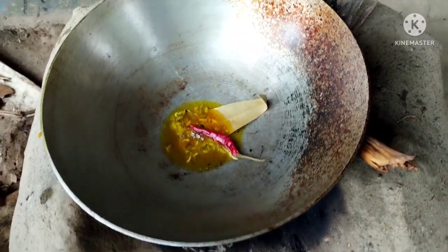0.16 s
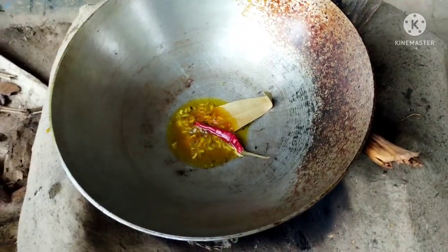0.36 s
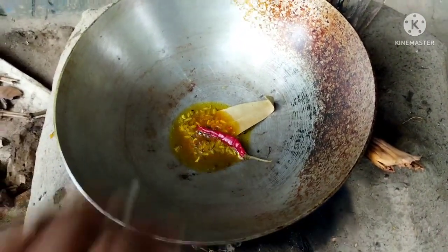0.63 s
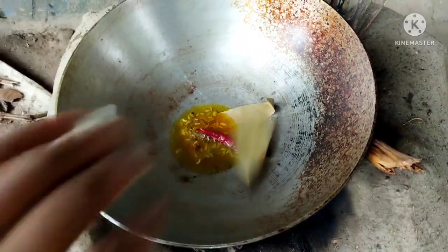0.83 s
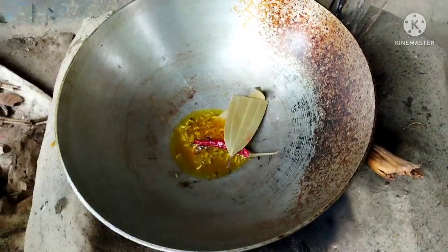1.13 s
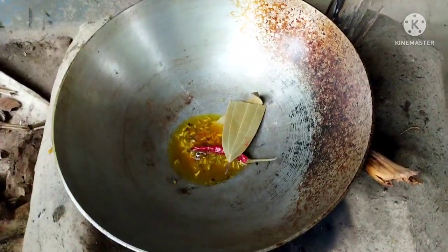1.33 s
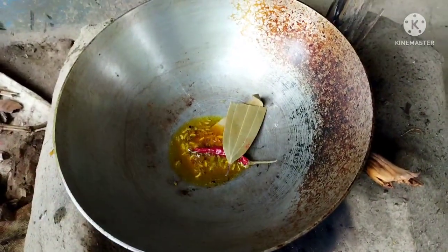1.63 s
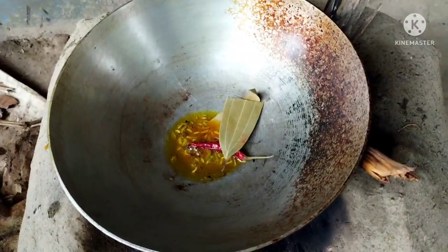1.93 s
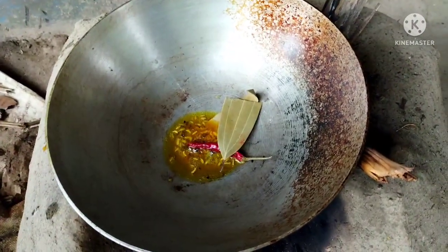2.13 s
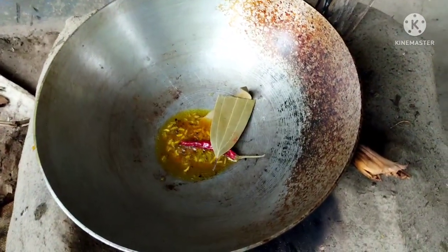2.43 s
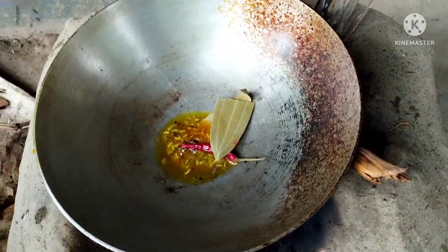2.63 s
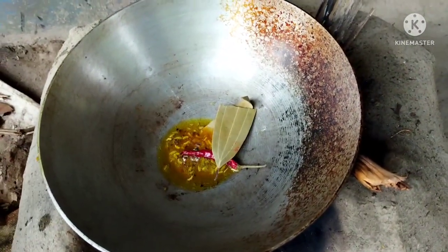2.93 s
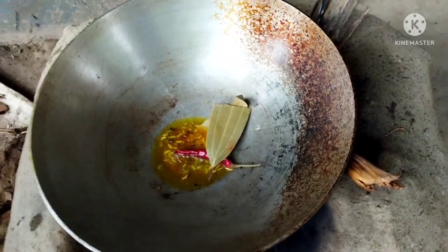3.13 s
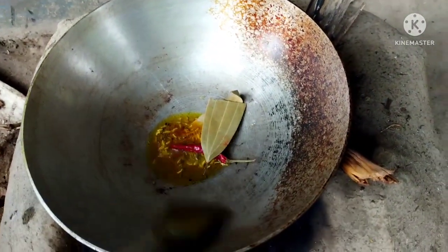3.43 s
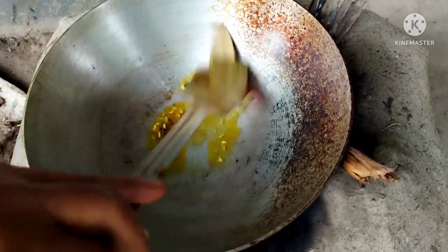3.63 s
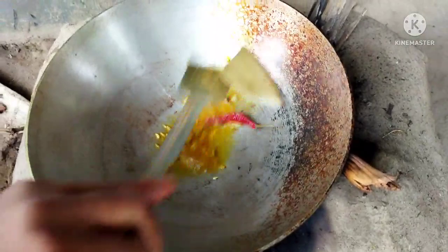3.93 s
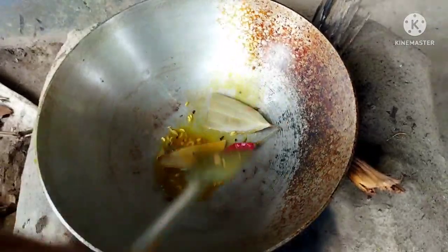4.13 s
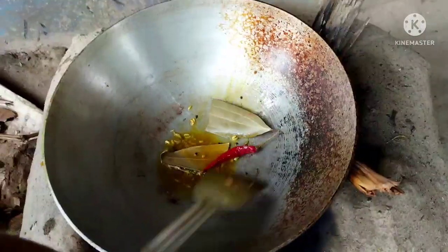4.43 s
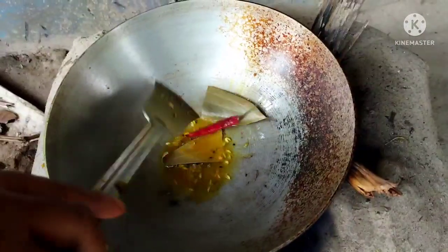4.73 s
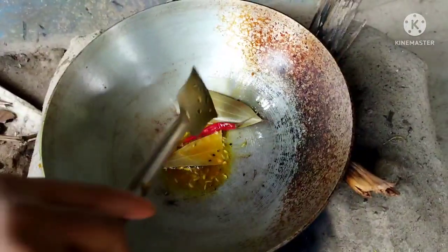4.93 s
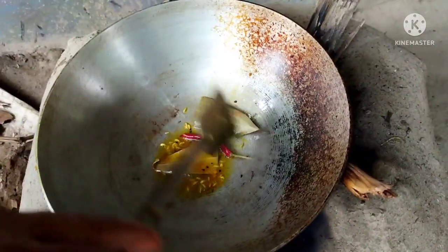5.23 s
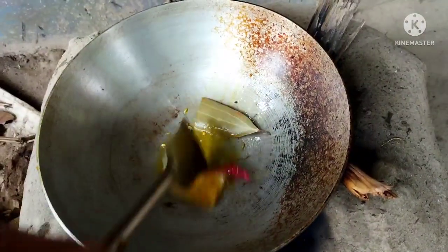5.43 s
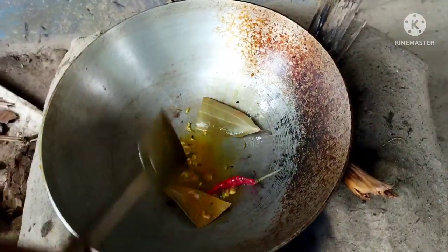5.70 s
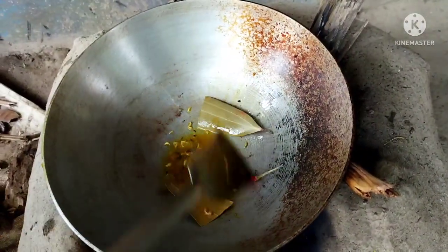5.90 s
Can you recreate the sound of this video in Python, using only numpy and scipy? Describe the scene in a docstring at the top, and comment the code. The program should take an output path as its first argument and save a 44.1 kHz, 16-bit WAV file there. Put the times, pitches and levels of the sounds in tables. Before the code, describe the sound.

A close microphone over a steel wok in a small walled yard catches a soft low fire rumble and very faint oil hiss. From 0 to 0.8 s dry spices knock and rustle in quick chatters, with hard clacks near 0.23 and 0.61 s; seeds snap around 0.18 and 0.9 s. Thin, breathy bird whistles droop faintly near 0.1, 1.1, 1.9 and 3 s. Light knocks return around 1.7-1.85 s. The fire deepens at 2.5 s while a spatula clinks delicately until 2.7 s; seeds pop at 2.9 s. At 3.33 s the blade scrapes the bowl, its hollow rub sweeping down at 3.5 s. Sizzling swells to a bright, dense peak around 4-4.4 s, then surges with uneven strokes, spitting drops and falling bubble pings. Gritty scrapes and dull bowl contacts punctuate 5.1-5.6 s, and lively sizzling continues to the end at about 6 s.

```python
"""Oil and whole spices sizzle in a steel wok over a wood fire in a walled yard: dense clicks and pings.
At first the fire rumbles in filtered noise, dry spices rustle and clatter through struck modes,
seeds pop as tiny chirps, a small bird whistles in gliding sines and a steel spatula rings in sines.
Then the spatula scrapes in uneven clicks and noise through the wok's modes, its hollow sweeps down,
and the stirred oil breaks into a loud sizzle with spitting drops and pinging bubbles."""
import sys
import numpy as np
from scipy import signal
from scipy.io import wavfile
from scipy.ndimage import uniform_filter1d

SR = 44100
rng = np.random.default_rng(int(sys.argv[2]) if len(sys.argv) > 2 else 0)


def output_pcm(signal):
    """Save a mono or channel-first signal as 16-bit PCM at the path in sys.argv[1].

    Samples are clipped to [-1, 1] before scaling.
    """
    pcm = np.clip(np.atleast_2d(signal).T, -1, 1) * 32767
    wavfile.write(sys.argv[1], SR, np.round(pcm).astype(np.int16))


N = 267246
TIME = np.arange(N) / SR

# strokes pushing oil onto hot steel: start_s, length_s, level_db, coarse_db (share of low crackle, relative)
STIR_STROKES = [(3.328, 0.095, -27.5, 10.5), (3.468, 0.1, -18, 1.5), (3.587, 0.081, -24, -7),
                (3.709, 0.12, -22, -3.5), (3.913, 0.2, -16.5, -1), (3.998, 0.1, -16, -2.5),
                (4.148, 0.073, -15.5, -4), (4.243, 0.2, -14, -3.5), (4.447, 0.15, -20, -3),
                (4.599, 0.13, -16, -4.5), (4.748, 0.08, -21, -10), (4.843, 0.15, -19.5, -6),
                (5.122, 0.29, -20.5, -1), (5.457, 0.05, -19, -4.5), (5.528, 0.16, -18.5, -6.5),
                (5.706, 0.19, -18.5, -6), (5.934, 0.13, -19, -1.5)]
# spectrum of stirred oil: frequency_hz, level_db
SIZZLE_COLOUR = [(150, -32), (400, -23), (850, -17), (1200, -20), (2300, -16), (3200, -10.5), (5000, -7.5),
                 (6100, 1), (8900, 3), (10200, -2.5), (11300, -7), (12800, -16), (15500, -10.5)]
# spectrum of a sharp crack or tap: frequency_hz, level_db
CRACK_COLOUR = [(300, -19.5), (900, -18.5), (3000, -8.5), (5000, -5), (8500, 2.5), (10500, -4.5),
                (13000, -24), (15500, -20)]

SLIDE_FALL_DB_PER_S = 301  # how fast a slide dies when it stops
BITE_RISE_S = 0.011


def amp(db):
    """Decibels to gain."""
    return 10 ** (np.asarray(db) / 20)


def evened(x):
    """Scales to rms 1."""
    return x / np.sqrt(np.mean(x ** 2) + 1e-20)


def read(points, hz):
    """Reads a spectrum on a log-frequency axis."""
    f, value = np.transpose(points)
    return np.interp(np.log(hz + 1), np.log(f + 1), value)


def follow(rows):
    """The columns of a curve at every sample."""
    s, *columns = np.transpose(rows)
    return [np.interp(TIME, s, c) for c in columns]


def add(mix, s, sound):
    """Mixes a sound in at time s."""
    part = mix[max(round(s * SR), 0):][:len(sound)]
    part += sound[:len(part)]


def colour(x, points):
    """Causal filter with the given spectrum; white noise keeps its power."""
    log_gain = np.log(amp(read(points, abs(np.fft.fftfreq(2 ** 12, 1 / SR)))))
    # the Hilbert transform gives the minimum phase
    taps = np.fft.ifft(np.exp(np.conj(signal.hilbert(log_gain)))).real
    return signal.oaconvolve(x, taps / np.linalg.norm(taps))[:len(x)]


def band(x, hz, kind, order=2):
    """High-pass or low-pass."""
    return signal.sosfilt(signal.butter(order, hz, kind, fs=SR, output="sos"), x)


def ring(x, modes):
    """Passes x through resonances (Hz, width, dB); white noise keeps its power."""
    t = TIME[:SR // 4]
    taps = sum(amp(db) * width * np.exp(-np.pi * width * t) * np.cos(2 * np.pi * hz * t)
               for hz, width, db in modes)
    return signal.oaconvolve(x, taps / np.linalg.norm(taps))[:len(x)]


def struck(modes, contact_hz):
    """The modes (Hz, width, dB) as a contact of the given pitch wakes them, favouring near ones."""
    focus_db = 23.5  # loss one octave away
    return [(hz, width, db - focus_db * np.log2(hz / contact_hz) ** 2) for hz, width, db in modes]


def glide(x, hz, width):
    """One resonance that follows the curve hz: shifted down to zero, smoothed and shifted back."""
    turn = np.exp(2j * np.pi * np.cumsum(hz) / SR)
    r = np.exp(-np.pi * width / SR)
    smoothed = signal.lfilter([(1 - r) ** 2], np.poly([r, r]), x / turn + 1e-18)
    return 2 * (turn * smoothed).real


def held(s, length, rise_s, fall_db_per_s):
    """Envelope: rises at time s, holds until s + length, then dies away."""
    t = TIME - s
    return np.clip(t / rise_s, 0, 1) * amp(-abs(fall_db_per_s) * np.maximum(t - length, 0))


def uneven(db, size):
    """A gain that wanders by db rms, smoothed over size samples."""
    return amp(db * evened(uniform_filter1d(rng.standard_normal(N), size=size)))


def clicks(per_s, spread_db, largest=2.6):
    """Random clicks of rms 1: many small, a few large."""
    size = amp(spread_db * np.minimum(rng.exponential(1, N), largest))
    sign = rng.choice([-1, 1], N)
    return evened(size * sign * (rng.random(N) < per_s / SR))


def fizz(per_s, spread_db, count=24):
    """Steam bubbles burst: bare ticks and short pings of random size, spread over many pitches."""
    pings = sum(ring(clicks(per_s / count, spread_db), [(hz, rng.uniform(330, 940), 0)])
                for hz in np.linspace(2500, 14000, count))
    return evened(evened(pings) + 2.0 * clicks(per_s, spread_db))


def cracks(rows):
    """One sharp crack for each row, treble first as the steel spreads it: a falling chirp."""
    crack_s = .001
    out, t = np.zeros(N), np.arange(0, crack_s, 1 / SR)
    crack = signal.chirp(t, 16000, crack_s, 0, phi=90) * signal.windows.tukey(len(t), .2)
    for s, db in rows:
        add(out, s - crack_s / 2, amp(db) * crack / np.linalg.norm(crack))
    return out


def yard(x, longer=1):
    """Close reflections from wok, ground and walls: noise dying at its own rate in each band."""
    # decay of the reflections: frequency_hz, t60_s (scaled by longer)
    decay = [(300, 0.055), (1000, 0.14), (2800, 0.13), (7500, 0.12), (15000, 0.0042)]
    t = TIME[:SR // 2]
    hz, s, z = signal.stft(rng.standard_normal(len(t)), SR, nperseg=128)
    fading = z * amp(-60 * s / (longer * read(decay, hz)[:, None]))
    tail = signal.istft(fading, SR)[1][:len(t)] * (t > .001)
    return signal.oaconvolve(x, tail / np.linalg.norm(tail))[:N]


def bowl_echo(x):
    """The curved wall of the wok returns each burst a moment later."""
    echo_s, echo_db = .002863, -14
    out = x.copy()
    add(out, echo_s, amp(echo_db) * x)
    return out / np.hypot(1, amp(echo_db))


def hearth():
    """The low rumble of the fire, deepening with each gust, and the faint hiss of resting oil."""
    # spectrum of the fire: frequency_hz, level_db
    rumble_colour = [(30, -0.5), (60, -9.5), (82, 0), (110, -7), (160, -21), (195, -11), (260, -32.5),
                     (500, -50)]
    # gusts of draught in the fire: middle_s, half_width_s, lift_db of the deepest rumble
    gusts = [(2.5, 0.19, 12), (5.5, 0.34, 7)]
    # oil left alone: time_s, level_db
    simmer_level = [(.3, -45.5), (1, -48.5), (1.55, -50.5), (2.35, -47), (3.2, -48.5)]
    # spectrum of resting oil: frequency_hz, level_db
    simmer_colour = [(150, -29), (300, -6.5), (1000, -10.5), (5000, -7.5), (6000, -2), (8500, 2.5),
                     (9600, 2.5), (11000, -11), (13000, -20), (15500, -19)]
    rumble = colour(rng.standard_normal(N), rumble_colour) * amp(-52.5)
    deep = signal.sosfiltfilt(signal.butter(2, 62, fs=SR, output="sos"), rumble)
    draught_db = sum(db * np.exp(-((TIME - s) / width) ** 2) for s, width, db in gusts)
    bursts = evened(fizz(5000, 6.5) + 2.6 * rng.standard_normal(N))
    hiss = colour(bursts, simmer_colour) * amp(follow(simmer_level)[0])
    return rumble + deep * (amp(draught_db) - 1) + hiss


def clatter():
    """Dry things knock in quick chatters and slides rustle in grains, bright over a duller body."""
    # knocks beside the wok: start_s, level_db, body_db, body_pitch_hz (levels relative)
    knocks = [(0.0014, -20.5, -3.5, 3450), (0.063, -24.5, -16, 3430), (0.2288, -6.5, -44, 3700),
              (0.2534, -16.5, -3, 3070), (0.485, -21, -14.5, 1900), (0.5545, -16, -27, 3200),
              (0.5855, -22.5, -19, 3300), (0.6113, -0.5, -16.5, 2430), (0.6347, -23.5, 4, 710),
              (0.67, -19, -7, 825), (0.701, -30, 0.5, 1140), (0.7807, -27.5, -8, 3600),
              (1.733, -25, -29, 2570), (1.8154, -19.5, -7, 1200), (1.8384, -15, -4.5, 1780),
              (2.7109, -14, -12.5, 2790), (2.8304, -26.5, -30, 3560)]
    # dry spices sliding over one another; the last row is a small spurt of sizzle:
    # start_s, length_s, level_db, body_db (levels relative)
    rustles = [(0.1, 0.02, -30, -9.5), (0.131, 0.04, -23, -15), (0.296, 0.011, -28.5, -21),
               (0.43, 0.056, -27, -22), (0.503, 0.039, -24.5, -34), (0.542, 0.08, -31, 6.5),
               (1.706, 0.058, -27.5, -5.5), (1.782, 0.062, -30, -3), (2.441, 0.03, -33, -23),
               (2.929, 0.021, -33, -14)]
    # spectrum of the bright part: frequency_hz, level_db
    bright_colour = [(1500, -35.5), (2600, 2), (5400, 3), (6600, 1), (8000, 5), (9300, 13.5), (11000, 4),
                     (12200, -0.5), (13200, -14), (15500, -21)]
    # spectrum of the body: frequency_hz, level_db
    body_colour = [(150, -19), (380, -5.5), (600, 1.5), (1100, 5.5), (1600, -4), (3800, -3.5),
                   (6000, -11.5), (12000, -20.5)]
    # rim modes that hard knocks ring: frequency_hz, width_hz, level_db
    rim_modes = [(3760, 110, -7), (7680, 42, 4.5), (8320, 120, 1.5), (10450, 53, 4.5)]
    # low modes of the knocking things: frequency_hz, level_db
    body_modes = [(575, 2), (1170, -1), (1500, -5), (1950, 3), (2280, 7), (3420, -4), (3730, 2)]
    slide_swell_db = 14  # a slide gathers speed, then stops

    bright, body, hard = np.zeros((3, N))
    t = TIME[:SR // 6]
    for s, db, body_db, hz in knocks:
        chatter = rng.standard_normal(len(t)) * amp(db - 4.5 - 60 * t / 0.066)
        # each spot favours some of the low modes and has high ones of its own
        low_modes = struck([(mode_hz, 55, mode_db) for mode_hz, mode_db in body_modes], hz)
        high_modes = [(mode_hz, 70, 0) for mode_hz in rng.uniform(3040, 15000, size=30)]
        add(bright, s, 0.27 * chatter + 0.54 * ring(chatter, high_modes))
        add(hard, s, chatter * amp(min(db + 10.0, 0)))
        thud = 0.18 * colour(chatter, body_colour) + 0.39 * ring(chatter, low_modes)
        add(body, s, thud * amp(body_db + 4))
    for s, length, db, body_db in rustles:
        speed_db = slide_swell_db * np.clip((TIME - s) / length - 1, -1, 0)
        catching = uneven(2, size=110)
        slide = held(s, length, 0.004, SLIDE_FALL_DB_PER_S) * amp(db + speed_db)
        grains = clicks(1400, 2.6) * catching * slide
        grain_modes = [(mode_hz, 130, 0) for mode_hz in rng.uniform(2880, 15600, size=30)]
        bright += 0.082 * grains + 0.5 * ring(grains, grain_modes)
        dull = band(band(grains, 3300, "high", order=3), 2350, "low", order=3)
        body += dull * amp(body_db + 15.5)
    rim = colour(bright, bright_colour) + .5 * band(ring(hard, rim_modes), 1800, "high")
    dry = rim + band(body, 140, "high") + amp(-13) * colour(bright, body_colour)
    return dry + amp(-7.0) * yard(dry, longer=1.13)


def bird():
    """Thin drooping whistles from across the yard, all breathy or hoarse to some degree, with flutter."""
    # calls: start_s, length_s, pitch_hz, level_db, overtones_db (levels relative), hoarseness (its size, either
    # sign, sets noise, flutter and pitch wobble; positive values cap noise and flutter at 1)
    calls = [(0.097, 0.049, 2920, -44.5, -15, 0.5), (0.142, 0.078, 2980, -54, -14, -1.5),
             (1.092, 0.15, 2956, -56, 4, 2.2), (1.159, 0.095, 2904, -51.5, -7, 1),
             (1.875, 0.1, 2580, -58.5, -16, 4), (2.98, 0.083, 3194, -61, -4, 0.7),
             (3.08, 0.06, 3210, -70, -14, -1)]
    sag_hz_per_s, skew = 655, 0.72  # each call droops in pitch and peaks early
    out = np.zeros(N)
    for s, length, hz, db, overtones_db, hoarse in calls:
        t = np.arange(0, length, 1 / SR)
        raspy = min(hoarse, 1)  # positive hoarseness beyond 1 grows only the pitch wobble; negative values grow all three
        waver = evened(uniform_filter1d(rng.standard_normal(SR), size=70))[:len(t)]
        pitch = (hz - sag_hz_per_s * (t - length / 2)) * (1 + .015 * hoarse * waver)
        phase = 2 * np.pi * np.cumsum(pitch) / SR
        rasp = band(band(rng.standard_normal(SR), 5400, "high"), 8000, "low", order=4)[:len(t)]
        overtones = amp(overtones_db) * (np.sin(2 * phase) + 0.49 * np.sin(3 * phase))
        wander = evened(uniform_filter1d(rng.standard_normal(SR), size=300))[:len(t)]
        swell = np.sin(np.pi * (t / length) ** skew) ** 2 * (1 + .4 * raspy * wander)
        voice = np.sin(phase) + overtones + raspy * amp(4.0) * rasp
        add(out, s, swell * amp(db + 12.5) * voice)
    return out + amp(-5.5) * yard(out, longer=3.3)


def pops():
    """A bursting seed cracks and the yard answers; a spitting drop is thinner and drier."""
    # seeds bursting: time_s, level_db (relative)
    seed_bursts = [(0.176, 0.5), (0.1833, -4), (0.9118, 5), (1.1893, -13), (2.8875, -8), (2.8948, -7)]
    # drops of water spitting out of the stirred oil: time_s, level_db (relative)
    spits = [(3.8172, 2), (3.8187, 8), (4.3826, 6), (4.4379, 6), (4.5081, 5), (4.6427, 6), (4.6916, 6),
             (4.774, 8), (4.7802, 5), (4.8551, 7), (4.8937, 6.5), (4.9921, 1), (5.0259, 8.5), (5.2151, 6),
             (5.4603, 7), (5.787, 5), (5.8045, 5), (5.8344, 8)]
    seeds = colour(cracks(seed_bursts), CRACK_COLOUR)
    thin = band(band(colour(cracks(spits), SIZZLE_COLOUR), 4500, "high"), 10200, "low")
    drops = bowl_echo(thin)
    return seeds + drops + amp(-2.5) * yard(seeds + drops / 2 ** 2)


def clinks():
    """The picked-up spatula rings after each tap; spot and hardness weigh its modes."""
    # taps: start_s, level_db, hardness_db_per_octave, spot (blade 0 to handle 1)
    taps = [(2.417, -48.5, -1, 0.32), (2.494, -39, 20.5, .3), (2.567, -31, 0.5, 0.027),
            (2.712, -30.5, 4.5, 1)]
    # modes of the spatula: frequency_hz, blade_db (tapped on the blade), handle_db (on the handle)
    modes = [(1925, -3, -14), (2165, -20, 0), (3456, -16, -2), (3720, -3, -7), (4136, -18, -1),
             (4861, -7, -16), (5730, -3, -9), (8650, -10, -3), (8925, -5, -1), (9666, -3, 1)]
    ring_t60_s = 0.14
    out, t = np.zeros(N), TIME[:SR // 4]
    for s, db, tilt_db, spot in taps:
        tone = np.zeros(len(t))
        for hz, blade_db, handle_db in modes:
            spot_db = blade_db + spot * (handle_db - blade_db)
            hardness_db = tilt_db * np.log2(hz / 6000)
            decay = amp(spot_db + hardness_db - 60 * t / ring_t60_s)
            tone += decay * np.sin(2 * np.pi * (hz * t + rng.random()))
        tap = colour(rng.standard_normal(len(t)), CRACK_COLOUR) * amp(8.5 - 60 * t / 0.082)
        add(out, s, amp(db) * (tone + tap))
    return out


def scrapes():
    """The blade sticks and slips, shaking the bowl; on bare steel its edge wakes higher modes and hisses."""
    # drags over the steel: start_s, length_s, hardest_grip_s (after the start), level_db (relative)
    drags = [(3.329, 0.2, 0.03, -28), (5.084, 0.26, 0.098, -32.5), (5.533, 0.18, 0.02, -31.5)]
    # the spatula meets the wok: start_s, level_db (relative), contact_pitch_hz
    contacts = [(3.3255, -21.5, 505), (3.936, -21.5, 550), (4.396, -29, 404), (5.141, -21.5, 428),
                (5.18, -31, 700), (5.404, -29, 650), (5.482, -23.5, 530), (5.566, -19, 725),
                (5.878, -30, 400)]
    # the edge bites into the wok: start_s, length_s, level_db (relative)
    bites = [(3.329, 0.12, -21.5), (3.465, 0.072, -21)]
    # low modes of the bowl: frequency_hz, width_hz, level_db
    bowl_modes = [(300, 22, -5), (322, 13, 4), (400, 60, -6), (545, 70, -7), (660, 28, 1.5), (721, 17, 3),
                  (775, 46, -1.5)]
    # higher modes of the bowl: frequency_hz, width_hz, level_db
    high_modes = [(1363, 35, 7), (1590, 28, -2), (2230, 34, 5), (2950, 25, 5)]
    # hissing modes of the blade: frequency_hz, width_hz, level_db
    blade_modes = [(8270, 490, 3), (10200, 150, -10)]
    grip_fall_db_per_s, drag_db, drag_fall_db_per_s = 233, -8.5, 110
    bite_ring_db, ring_fall_db_per_s, hiss_fall_db_per_s = -16, 160, 228

    drag, blows, t = np.zeros(N), np.zeros(N), TIME[:SR // 3]
    for s, length, grip_s, db in drags:
        # steady drag plus a peak at the hardest grip
        pressure = amp(drag_db) + amp(-grip_fall_db_per_s * abs(TIME - s - grip_s))
        stroke = held(s, length, 0.0019, drag_fall_db_per_s) * pressure * amp(db)
        drag += clicks(2000, 3.7) * uneven(2, size=400) * stroke
    for s, db, hz in contacts:
        blow = rng.standard_normal(len(t)) * amp(db - 3.5 - 60 * t / 0.07)
        add(blows, s, ring(blow, struck(bowl_modes, hz)))
    bowl = ring(band(drag, 750, "low", order=5), bowl_modes) + blows

    ringing, hissing = (sum(amp(db) * held(s, length, BITE_RISE_S, fall) for s, length, db in bites)
                        for fall in (ring_fall_db_per_s, hiss_fall_db_per_s))
    slips = rng.standard_normal(N)
    edge_ring = ring(slips * uneven(2, size=900) * ringing * amp(bite_ring_db), high_modes)
    edge_hiss = band(ring(slips * hissing, blade_modes), 7600, "low")
    return band(bowl, 130, "high") + band(edge_ring + edge_hiss, 1850, "high")


def stirring():
    """Every stroke flares up and dies down; gives the sizzle level and its share of low crackle in dB."""
    rise_s, fall_db_per_s = 0.012, 133
    after_sizzle_db = -29  # the wetted steel keeps sizzling between strokes
    power = np.full(N, amp(after_sizzle_db) ** 2)
    coarse_power = power * amp(-1.5) ** 2
    for s, length, db, coarse_db in STIR_STROKES:
        flare = held(s, length, rise_s, fall_db_per_s) * amp(db)
        power += flare ** 2
        coarse_power += (flare * amp(coarse_db)) ** 2
    return 10 * np.log10(power), 10 * np.log10(coarse_power / power)


def sizzle():
    """Stirred oil spits in tiny bursts; a larger share of coarse bubbles adds sparser, lower crackle."""
    # wet spices flashing to steam: start_s, level_db (relative)
    spatters = [(3.924, -13), (4.3957, 1), (4.855, -7)]
    # high modes of the bowl, rung by the sizzle: frequency_hz
    shimmer_modes = [4308, 4736, 5735, 7429]
    spatter_db, spatter_t60_s = -6.5, .025

    t = TIME[:SR // 30]
    level_db, coarse_db = stirring()
    crackle = fizz(per_s=1700, spread_db=4.5) * uneven(1.4, size=130)
    # on freshly wetted hot steel the bursts crowd into a hiss, then thin out
    crowding = np.interp(TIME, [3.6, 3.75, 4.65], [.8, .4, .05])
    fine = np.sqrt(1 - crowding) * crackle + np.sqrt(crowding) * rng.standard_normal(N)
    sparse = band(fizz(per_s=320, spread_db=4.6), 1400, "high", order=1)
    coarse = evened(fine + 1.3 * (1 - crowding) * sparse)
    # the coarse crackle takes over below the split, the fine one stays above it
    split = signal.butter(3, 5000, fs=SR, output="sos")
    spray = fine + signal.sosfiltfilt(split, coarse * amp(coarse_db + 2.5) - fine)
    # fiercer boiling throws finer, brighter droplets
    treble = signal.butter(2, 10500, "high", fs=SR, output="sos")
    mist = signal.sosfiltfilt(treble, spray)
    spray = spray + mist * (amp(0.55 * (level_db + 2.5)) - 1)
    spray = spray * (TIME > STIR_STROKES[0][0]) * amp(level_db)
    for s, db in spatters:
        steam = band(rng.standard_normal(len(t)), 15000, "low")
        add(spray, s, steam * amp(db + spatter_db - 60 * t / spatter_t60_s))
    dry = bowl_echo(colour(spray, SIZZLE_COLOUR))
    shimmer = ring(dry, [(hz, 50, 0) for hz in shimmer_modes])
    return .92 * dry + amp(-17) * yard(dry) + amp(-23) * shimmer


def grinding():
    """Grit rasps under the blade in short bursts, and the hollow beneath it sweeps downward."""
    # grit caught under the blade: start_s, level_db (relative)
    grinds = [(5.142, -29), (5.402, -27), (5.484, -28)]
    # the hollow drops in pitch as the blade slides up the wall:
    # start_s, length_s, first_hz, last_hz, level_db (relative)
    sweep = (3.5, 0.1, 800, 340, -24.5)
    pressure = sum(amp(db) * held(s, 0.011, BITE_RISE_S / 2, SLIDE_FALL_DB_PER_S) for s, db in grinds)
    grit = rng.standard_normal(N) * uneven(1.8, size=150) * pressure
    rasp = band(band(grit, 2200, "low", order=5), 670, "high")
    s, length, first_hz, last_hz, db = sweep
    rub = rng.standard_normal(N) * held(s, length, BITE_RISE_S, SLIDE_FALL_DB_PER_S) * amp(db)
    hollow_hz = np.interp(TIME, [s, s + length], [first_hz, last_hz])
    return rasp + glide(rub, hollow_hz, 140)


def bubbles():
    """A large bubble under the blade collapses in a quick run of falling pings."""
    # collapses: start_s, level_db, pitch_hz (of the first ping)
    collapses = [(4.5553, -12, 3920), (4.600, -13, 3360), (4.78, -9.5, 4240), (4.802, -20.5, 2140),
                 (4.908, -16.5, 3330), (4.992, -9, 4330), (4.999, -12.5, 5100), (5.208, -10, 3380),
                 (5.343, -13.5, 4960), (5.823, -12, 4000), (5.888, -8.5, 3600), (5.9499, -11.5, 3450),
                 (6.0213, -9, 3870)]
    # every rebound is weaker and lower
    rebound_s, rebound_db, rebound_octaves, ping_t60_s = 0.0085, -6.5, -0.098, 0.012
    out, t = np.zeros(N), TIME[:SR // 25]
    for s, db, hz in collapses:
        for k, jitter in enumerate(rng.uniform(0.81, 1.0, size=3)):
            pitch = hz * 2 ** (rebound_octaves * k)
            spit = ring(rng.standard_normal(len(t)), [(pitch, 1500, 0)])
            ping = (np.sin(2 * np.pi * pitch * t) + spit) / np.sqrt(2)
            onset = 1 - np.exp(-t / 0.00029)
            decay = amp(db + rebound_db * k - 60 * t / ping_t60_s)
            add(out, s + k * rebound_s * jitter, ping * onset * decay)
    return out + amp(-6.5) * yard(out)


def scene():
    """Everything at one microphone above the wok."""
    from_the_start = hearth() + clatter() + bird() + pops() + clinks()
    stirred = scrapes() + sizzle() + grinding() + bubbles()
    return (from_the_start + stirred)[None]


def record(dry):
    """The loudest peaks clip; then a steep low-pass sets the band limit."""
    edge_hz = 15600
    low_pass = signal.firwin(511, edge_hz, window=("kaiser", 9), fs=SR)
    return signal.oaconvolve(np.clip(dry, -.84, .84), low_pass[None], "same")


dry = scene()
out = record(dry)
output_pcm(out)
```